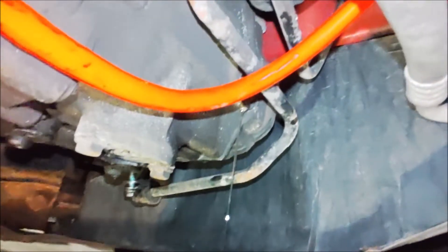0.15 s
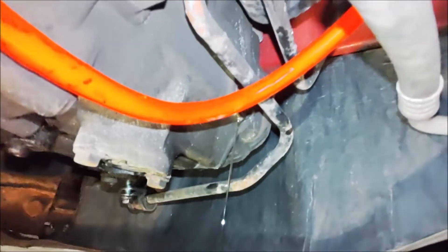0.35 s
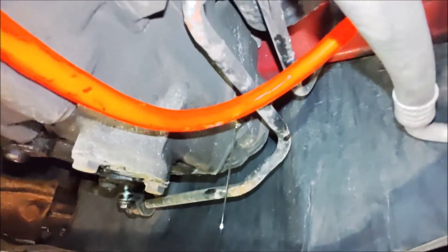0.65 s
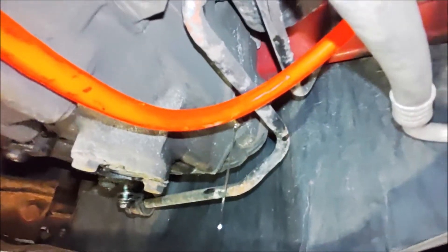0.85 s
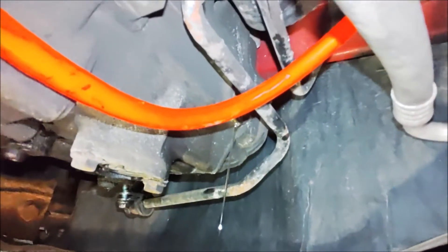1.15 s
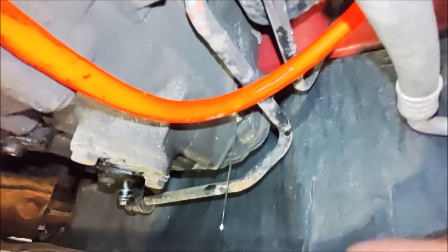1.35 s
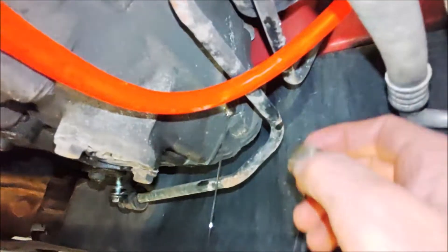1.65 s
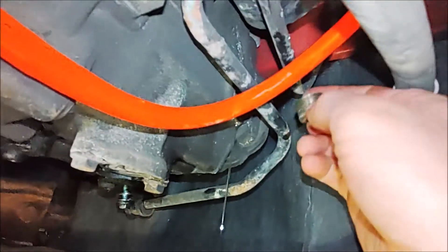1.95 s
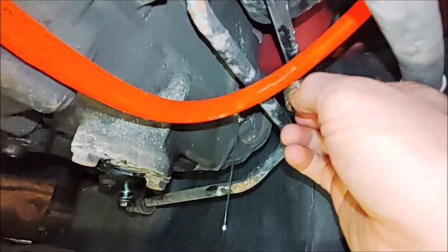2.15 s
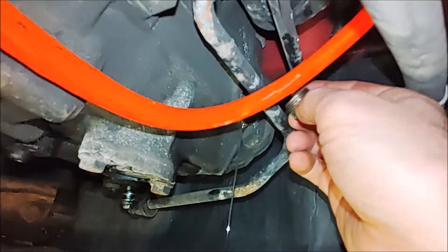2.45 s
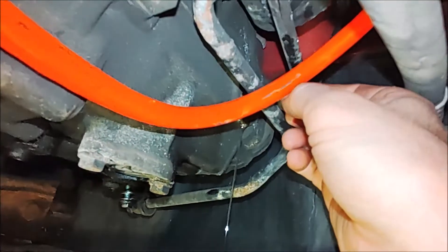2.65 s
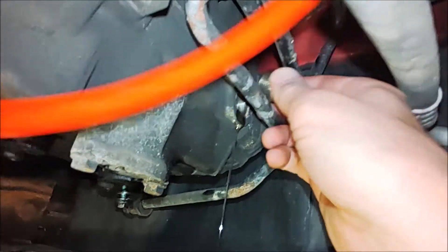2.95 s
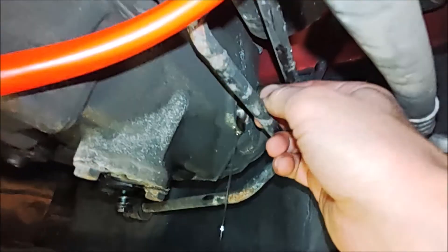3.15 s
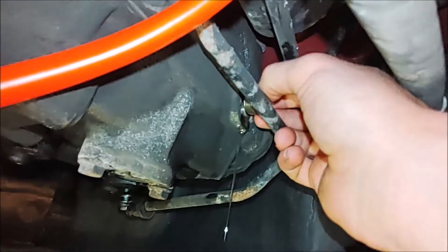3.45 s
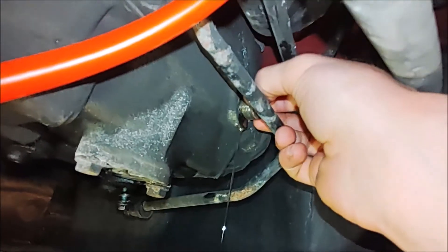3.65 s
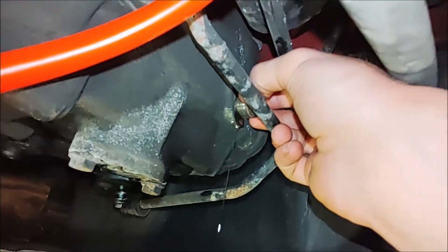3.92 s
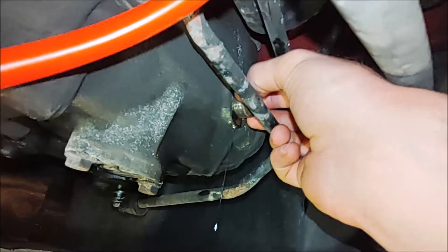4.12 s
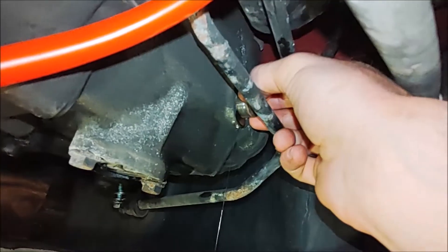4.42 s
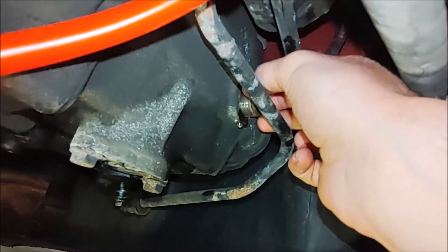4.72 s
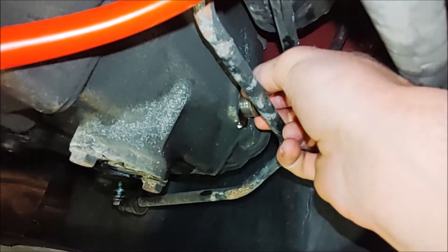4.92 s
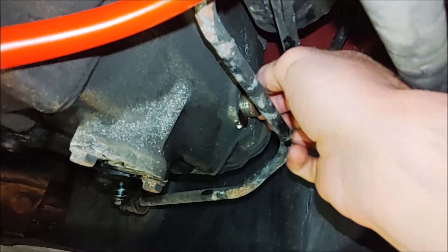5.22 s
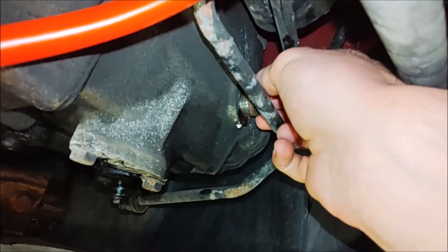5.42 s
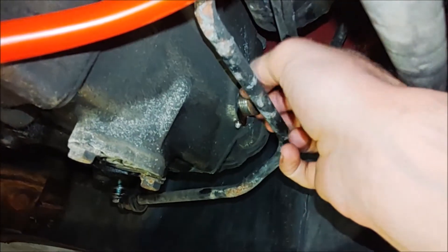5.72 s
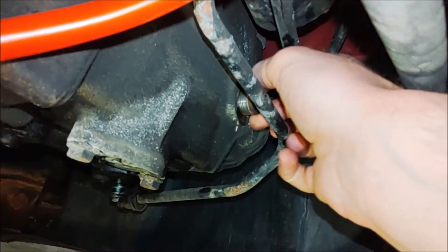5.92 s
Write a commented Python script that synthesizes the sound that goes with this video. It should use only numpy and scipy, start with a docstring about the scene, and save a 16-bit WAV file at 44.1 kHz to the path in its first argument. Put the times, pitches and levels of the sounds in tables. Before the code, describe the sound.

Close handheld pickup under a car in a garage, with flickering soft hiss, low rumble and a short diffuse echo. At 0-0.4 s there are deep handling bumps, bright plastic snaps, the strongest near 0.2, and a short gritty rasp with narrow ringing. Snaps and crinkling continue irregularly from 0.6 to 1.4, then become lighter. Small hollow raps on the recorder case and finger rubs come at 1.5-1.8, with a faint steel squeak. Sparse crackles run from 2 to 2.9. At 3.1 a hard dry click lands with a low thump; crisp snaps then crowd together until 4.07, when a very loud, harsh crack hits. Thin metallic squeaks flutter at 4.0-4.5, another sharp snap comes near 4.4, and a finger slide follows. Tiny high steel taps sound at 4.8-5.2. The end is quiet, with a few small crinkles and a soft cloth swish at 5.8.

```python
"""Plastic sheet snaps and crinkles under a car in a garage as a mechanic shifts on it and screws in a plug.
Snaps and crinkles are noise bursts and grains ringing patches of sheet and the hollow below the car.
The plug squeaks (filtered grains) and taps (decaying sines); hard clicks, a rasp and a cloth swish pass.
Fingers slide on, bump and rap the handheld recorder: filtered grains and decaying sines.
Coloured noise makes its rumble and the flickering hiss."""
import sys
import numpy as np
from scipy import signal
from scipy.fft import rfft, irfft
from scipy.io import wavfile
from scipy.ndimage import uniform_filter1d

SR = 44100
rng = np.random.default_rng(int(sys.argv[2]) if len(sys.argv) > 2 else 0)


def unload_wav(signal):
    """Save mono or channel-first audio to the path in sys.argv[1] as 16-bit WAV at rate SR, clipped to [-1, 1]."""
    wavfile.write(
        sys.argv[1],
        SR,
        np.round(np.clip(np.atleast_2d(signal).T, -1, 1) * 32767).astype(np.int16),
    )


N = 267687

# Resonances of the space below the car. Each row: frequency in Hz, width in Hz, level in dB.
HOLLOW_MODES = [(589.4, 54, 6.5), (1082, 109, 4.5), (1317, 33, 11), (1402, 126, 5.5), (1670, 390, 1),
                (2030, 96, 5.5), (2153, 46, 6.5), (2520, 290, 2.5)]
# Spectrum of plastic through the microphone port. Each row: frequency in Hz, density in dB per Hz.
PLASTIC_SPECTRUM = [(1200, -20.5), (2500, -11.5), (3500, -4.5), (5000, -7.5), (6300, -2), (7200, -8.5),
                    (8600, 3.5), (9600, -1.5), (10500, -12), (12500, -13), (16000, -11)]


def from_db(db):
    """Amplitude ratio of a level in dB."""
    return 10 ** (np.asarray(db) / 20)


def rms_one(x):
    """Scale to rms 1."""
    return x / np.sqrt(np.mean(x ** 2) + 1e-20)


def in_time(rows):
    """Columns of a curve table, interpolated to one value per sample."""
    times_s, *columns = np.transpose(rows)
    return [np.interp(np.arange(N) / SR, times_s, column) for column in columns]


def drift(rate_hz):
    """Slow chance of rms 1: white noise through a double real pole."""
    r = np.exp(-2 * np.pi * rate_hz / SR)
    noise = rng.standard_normal(N + SR)
    settled = signal.lfilter([1], [1, -2 * r, r * r], noise)[SR:]
    return rms_one(settled)


def colour(x, spectrum):
    """Minimum-phase filter following a (Hz, dB) spectrum; white noise keeps its rms."""
    hz, db = np.transpose(spectrum)
    grid_hz = np.linspace(0, SR / 2, 2049)
    gain = from_db(np.interp(np.log(grid_hz + 1), np.log(hz), db))
    cepstrum = irfft(np.log(gain))
    cepstrum[1:2048] *= 2   # folding gives minimum phase
    cepstrum[2049:] = 0
    taps = irfft(np.exp(rfft(cepstrum)))
    return signal.oaconvolve(x, taps / np.sqrt(np.sum(taps ** 2)))[:len(x)]


def resonance(x, hz, width_hz):
    """Two-pole peak of gain 1."""
    r = np.exp(-np.pi * width_hz / SR)
    numerator = np.array([1, 0, -1]) * (1 - r * r) / 2
    return signal.lfilter(numerator, [1, -2 * r * np.cos(2 * np.pi * hz / SR), r * r], x)


def body(x, peaks, waver_db=0.):
    """Parallel resonances of alternating sign, each drive wavering alone; white noise about keeps its rms."""
    power = sum(from_db(2 * db) * np.pi * width_hz / SR for hz, width_hz, db in peaks)
    out = 0
    for k, (hz, width_hz, db) in enumerate(peaks):
        drive = x * from_db(waver_db * drift(10.2)) + 1e-18
        out = out + (-1) ** k * from_db(db) * resonance(drive, hz, width_hz)
    return out / np.sqrt(power)


def grains(per_s, spread_db):
    """Random tiny clicks of uneven size and sign; rms 1."""
    sizes = from_db(spread_db * np.minimum(rng.exponential(1, N), 4)) * rng.choice([-1, 1], N)
    return rms_one(sizes * (rng.random(N) < per_s / SR))


def swell(start_s, length_s):
    """Rounded rise and fall of one gesture."""
    phase = np.clip((np.arange(N) / SR - start_s) / length_s, 0, 1)
    return np.sqrt(np.sin(np.pi * phase) + 1e-12)


def strike(hits, modes):
    """Each (s, dB) hit sets the (Hz, dB, t60 s) modes ringing as decaying sines."""
    t = np.arange(SR // 4) / SR
    out = np.zeros(N)
    ring = sum(np.sin(2 * np.pi * hz * t) * from_db(db - 60 * t / t60_s) for hz, db, t60_s in modes)
    for s, db in hits:
        at = round(s * SR)
        out[at:at + len(t)] += from_db(db) * ring
    return out


def snaps(rise_s=0.0011, broad_db=-7, side_db=-10, hollow_db=-6, linger=0.99, click=5.0, width_scale=1.7,
          top_db=-20.0, tick_db=-17.0):
    """A broad crack, then a gritty tail ringing a patch of sheet, a few side pitches and the hollow."""
    # Snaps of sheet and plug. Each row: start in seconds, level in dB, patch pitch in Hz,
    # hollow ring in dB re level (before hollow_db), t60 in seconds (before linger in the hollow),
    # first crack in dB re patch ring, width as share of pitch (before width_scale).
    snap_rows = [(0.0186, -28, 5850, -34, 0.064, 7, 0.11), (0.05, -27, 7660, -15, 0.076, -25, 0.099),
                 (0.0947, -14.5, 7740, -13.5, 0.093, 2, 0.7), (0.202, -26.5, 1830, -20, 0.13, 3, 0.19),
                 (0.2167, -9, 7480, -28, 0.046, -39, 0.12), (0.332, -37, 6900, -23, 0.049, -17, 0.18),
                 (0.359, -34, 7060, -20, 0.052, -17, 0.2), (0.39, -41, 6840, -20, 0.042, -15, 0.2),
                 (0.5905, -29, 8800, -13.5, 0.37, -9, 0.25), (0.625, -13.5, 8600, -31, 0.068, -1, 1),
                 (0.795, -19.5, 6400, -27, 0.07, -0.5, 0.049), (0.82, -30, 9100, -30, 0.042, -10, 0.3),
                 (0.8693, -19, 7300, -14.5, 0.037, -5, 0.74), (0.9, -25, 6650, -29, 0.05, 12, 0.12),
                 (0.911, -12, 7100, -25, 0.047, -29, 0.12), (0.9932, -31, 8000, -11, 0.11, -13, 0.36),
                 (1.013, -28, 7600, -14.5, 0.14, -12, 0.43), (1.051, -21.5, 9900, -10.5, 0.064, -21, 0.37),
                 (1.0868, -23, 7300, -10, 0.2, 7, 0.12), (1.19, -35, 2010, -10.5, 0.18, 14, 0.14),
                 (1.284, -23, 6570, -12, 0.091, 1, 0.11), (1.2946, -17.5, 7780, -19, 0.043, -35, 0.081),
                 (1.365, -33, 2330, -11, 0.062, 4, 0.14), (1.38, -32.5, 6250, -22, 0.1, 4, 0.1),
                 (1.513, -24.5, 8300, -14, 0.14, 11, 0.22), (1.641, -29, 8650, -19, 0.09, 3, 0.13),
                 (1.651, -31.5, 7900, -9.5, 0.23, 0.5, 0.52), (1.729, -22.5, 7900, -22, 0.083, 10, 0.13),
                 (1.7934, -22.5, 7860, -12, 0.095, 5, 0.87), (1.819, -29.5, 8460, -9.5, 0.062, -4, 0.13),
                 (1.8622, -24, 7700, -10, 0.05, -30, 1), (1.9877, -20, 9200, -12.5, 0.06, -2.5, 0.058),
                 (2.1209, -31, 2030, -9, 0.051, 2, 0.064), (2.2139, -26.5, 5860, -34, 0.046, 7.5, 0.062),
                 (2.228, -29, 9260, -9.5, 0.083, -13, 0.54), (2.4015, -24.5, 8150, -12.5, 0.065, 10, 0.29),
                 (2.45, -33, 8450, -7.5, 0.062, -14, 0.076), (2.509, -36, 4870, 1.5, 0.07, -17, 0.15),
                 (2.565, -26.5, 1880, -10.5, 0.026, -19, 0.56), (2.57, -33, 1900, -6, 0.051, -14, 0.18),
                 (2.649, -29, 6400, -12.5, 0.07, 6, 0.51), (2.669, -33.5, 6640, -12, 0.15, 4, 0.66),
                 (2.7005, -28.5, 6400, -8.5, 0.041, -30, 0.099), (2.7473, -24, 8350, -12, 0.13, 6, 0.31),
                 (2.768, -32.5, 1850, -5.5, 0.049, -21, 0.48), (2.7912, -33.5, 4220, -35, 0.063, 2, 0.13),
                 (2.9536, -23.5, 8800, -5, 0.023, -29, 0.27), (2.9902, -27.5, 7900, 6.5, 0.038, -6, 0.13),
                 (3.124, -22, 8000, -17, 0.27, 7.5, 0.12), (3.1451, -24, 9400, -33, 0.024, 19, 0.13),
                 (3.271, -33.5, 9100, -2, 0.12, -11, 0.35), (3.332, -27, 9600, -22, 0.36, -2, 0.5),
                 (3.3544, -27, 9200, -3.5, 0.03, -3, 0.12), (3.4258, -21, 8370, -32, 0.084, -17, 0.23),
                 (3.439, -23.5, 8700, -19, 0.075, -16, 0.049), (3.491, -32, 8200, -4.5, 0.21, -12, 0.16),
                 (3.53, -27, 7940, -39, 0.083, 4, 0.13), (3.5696, -28.5, 7450, -36, 0.069, -12, 0.29),
                 (3.5966, -16, 8500, -16, 0.055, 4, 0.056), (3.662, -26.5, 1940, -12, 0.075, 5, 0.063),
                 (3.705, -32, 8100, -23, 0.031, -7, 0.2), (3.715, -21.5, 8400, -18, 0.063, -28, 0.063),
                 (3.7504, -23.5, 7870, -9.5, 0.037, -24, 0.11), (3.7925, -28, 8650, -34, 0.14, 7, 0.13),
                 (3.8308, -16, 8100, -18.5, 0.036, -29, 0.3), (3.847, -22.5, 7900, -12, 0.092, -24, 0.24),
                 (3.91, -23.5, 9200, -16, 0.2, -37, 0.39), (3.9454, -18.5, 8300, -41, 0.077, -36, 0.11),
                 (3.978, -29.5, 5600, 1, 0.038, -4, 0.2), (3.998, -29, 8150, -30, 0.049, -6, 0.11),
                 (4.0255, -21.5, 8200, -42, 0.05, -11, 0.09), (4.061, -34, 7570, -35, 0.098, -19, 0.22),
                 (4.0748, 0.5, 7000, -28, 0.05, 4, 0.63), (4.18, -35.5, 5650, -29, 0.053, -7, 0.22),
                 (4.2043, -31, 8200, -30, 0.039, -20, 0.099), (4.217, -38, 3320, -14, 0.03, -6, 0.5),
                 (4.259, -26.5, 9600, -43, 0.11, -5, 0.039), (4.2854, -23.5, 7840, -11.5, 0.038, 0, 0.08),
                 (4.3683, -15.5, 8750, -48, 0.066, -39, 0.06), (4.3856, -29.5, 8300, -19, 0.091, -14, 0.17),
                 (4.4547, -34, 8970, -29, 0.076, -9, 0.08), (4.6576, -35.5, 7450, -24, 0.55, 9.5, 0.22),
                 (4.834, -27, 4200, -11, 0.026, -20, 0.67), (4.936, -22.5, 9840, -26.5, 0.041, -3, 0.21),
                 (5.053, -38, 3370, -4, 0.029, -13, 0.68), (5.112, -44, 2780, -11, 0.17, -10, 0.5),
                 (5.068, -37, 8450, -15, 0.085, 13, 0.39), (5.1956, -34.5, 8100, -21, 0.19, -1, 0.29),
                 (5.2269, -30, 2460, -7, 0.073, -18, 0.44), (5.2288, -20.5, 4500, -17, 0.016, -28, 0.42),
                 (5.352, -33, 8900, -20, 0.068, 2, 0.29), (5.7634, -34, 9200, -16, 0.13, -28, 0.27)]
    # First instant of a snap. Each row: frequency in Hz, density in dB per Hz.
    crack_spectrum = [(200, -85), (700, -35), (1500, -14.5), (3000, -7), (4500, -4), (6200, -1.5),
                      (9000, -1.5), (11000, -17.5), (16000, -6.5)]
    t = np.arange(SR // 6) / SR
    bright, dull = np.zeros((2, N + len(t)))
    tick = colour(1. * (t == 0), PLASTIC_SPECTRUM)   # the crease lets go
    tick *= from_db(tick_db) / np.max(np.abs(tick))
    # quick rise, fullest about 2 ms in
    onset = (1 - np.exp(-t / rise_s)) * (1 + 0.69 * np.exp(-t / 0.0022))
    noises = rng.standard_normal((len(snap_rows), 3, len(t)))
    sides = rng.random((len(snap_rows), 3))
    for row, noise, side in zip(snap_rows, noises, sides):
        s, db, hz, ring_db, t60_s, crack_db, width = row
        at, t60_s = round(s * SR), max(t60_s, .005)
        grit = from_db(2 * rms_one(uniform_filter1d(noise[2], size=90)))   # small after-ticks
        tail = noise[0] * grit * onset * from_db(-60 * t / t60_s)
        tail[0] = click   # opens with one clean click

        width_hz = width_scale * np.clip(width, .02, 1) * hz
        patch = resonance(resonance(tail, hz, width_hz), hz, width_hz)   # twice: steep skirts
        others = sum(resonance(tail, other_hz, 0.03 * other_hz) for other_hz in hz * 1.7 ** (side - .6))
        others += from_db(top_db + 13.6 * side[0]) * resonance(tail, 10700, 5500)   # uneven top
        patch += from_db(side_db) * others
        broad = rms_one(colour(tail, PLASTIC_SPECTRUM))
        patch = rms_one(patch) + from_db(broad_db + crack_db) * broad

        crack = colour(noise[0] * np.exp(-t / .0007), crack_spectrum)
        sound = patch / np.max(np.abs(patch)) + from_db(crack_db) * crack / np.max(np.abs(crack))
        bright[at:at + len(t)] += from_db(db) * (sound / np.max(np.abs(sound)) + tick)
        decay = from_db(db + ring_db + hollow_db - 60 * t / (linger * t60_s))
        dull[at:at + len(t)] += decay * noise[1] * grit
    port = signal.butter(2, 14000, fs=SR, output="sos")   # the microphone port dulls the top
    return signal.sosfilt(port, garage(bright[:N])) + body(dull[:N], HOLLOW_MODES)


def garage(x):
    """Adds a diffuse, dying echo of band-passed noise, without bass or top."""
    echo_db, t60_s = -17, 0.15
    t = np.arange(SR // 2) / SR
    band = signal.butter(2, [1500, 9500], "band", fs=SR, output="sos")
    echo = signal.sosfilt(band, rng.standard_normal(len(t)))
    echo *= (1 - np.exp(-t / 0.0021)) * from_db(-60 * t / t60_s)
    return x + from_db(echo_db) * signal.oaconvolve(x, echo / np.sqrt(np.sum(echo ** 2)))[:N]


def crinkle(count=18):
    """Grains of creasing plastic, swelling in crumples; each patch of sheet has its pitch and fits."""
    # Crinkling between the snaps. Each row: time in seconds, bright level in dB, hollow level in dB.
    crinkle_curve = [(0.0, -53.5, -58.5), (0.27, -45, -48), (0.47, -49, -55), (0.98, -54, -55),
                     (1.49, -60.5, -63.5), (1.77, -54, -62.5), (2.0, -62.5, -60), (2.6, -63.5, -63),
                     (2.97, -46.5, -51.5), (3.25, -46.5, -64), (3.38, -57.5, -62), (3.5, -43.5, -52.5),
                     (3.82, -95, -55), (4.18, -48.5, -58.5), (4.41, -61, -67), (4.77, -58, -66.5),
                     (4.95, -68, -74.5), (6.07, -63, -86)]
    # Many creases at once. Each row: start in seconds, length in seconds, bright level in dB, hollow level in dB.
    crumple_rows = [(0.242, 0.065, -33, -34), (0.611, 0.14, -59, -49.5), (1.078, 0.057, -35, -42.5),
                    (1.414, 0.091, -46.5, -45.5), (1.497, 0.067, -38, -42), (1.701, 0.077, -49, -42),
                    (1.974, 0.018, -44, -38.5), (2.102, 0.083, -56, -51.5), (2.985, 0.018, -44, -57),
                    (3.228, 0.044, -42.5, -39), (3.426, 0.077, -75, -46), (3.703, 0.052, -43, -46.5),
                    (3.938, 0.062, -42, -52.5), (4.382, 0.025, -42.5, -52), (4.788, 0.044, -49, -74),
                    (5.758, 0.034, -51.5, -83), (5.974, 0.071, -50.5, -57)]
    bright, hollow = from_db(in_time(crinkle_curve))
    for s, length_s, bright_db, hollow_db in crumple_rows:
        phase = np.clip((np.arange(N) / SR - s) / length_s, 0, 1)
        shape = (np.sin(np.pi * phase ** 0.65) + 1e-12) ** 1.4
        bright = bright + from_db(bright_db) * shape
        hollow = hollow + from_db(hollow_db) * shape

    ticks = grains(5000, spread_db=4.5)
    patch = rng.integers(0, count, N)   # which patch each grain excites
    patches = 0
    for k, hz in enumerate(np.geomspace(2400, 15000, count)):
        ring = rms_one(resonance(ticks * (patch == k), hz, .07 * hz))
        patches = patches + ring / np.sqrt(hz) * from_db(4 * drift(15))
    fine = from_db(17.0) * grains(3300, spread_db=-8.0)
    creases = colour(rms_one(patches) + fine, PLASTIC_SPECTRUM)
    creases *= from_db(2.5 * drift(45))   # in quick fits
    drive = grains(900, spread_db=4.5) * from_db(3 * drift(30))
    ringing = body(drive, HOLLOW_MODES, waver_db=4.5)
    return bright * rms_one(creases) + hollow * rms_one(ringing)


def thread():
    """Steel squeaks on steel: uneven slips ring plug and housing at a pitch that changes with the hold."""
    # Squeaks as the plug is handled and turned. Each row: start in seconds, length in seconds,
    # level in dB, pitch in Hz.
    squeaks = [(1.775, 0.033, -41, 2070), (3.965, 0.036, -42.5, 2200), (4.236, 0.025, -49, 2240),
               (4.264, 0.025, -46, 2300), (4.336, 0.013, -55, 2340), (4.37, 0.033, -50, 2370),
               (4.38, 0.026, -43.5, 2540), (4.451, 0.013, -52, 2530)]
    width_hz = 200
    slips = grains(1900, spread_db=4.5)
    out = np.zeros(N)
    for s, length_s, db, hz in squeaks:
        ring = resonance(resonance(slips, hz, width_hz), hz, 2 * width_hz)
        ring += from_db(-9) * resonance(slips, 1.04 * hz, 2 * width_hz)
        out += from_db(db) * swell(s, length_s) * rms_one(ring)
    return out


def plug():
    """The plug taps the housing; each tap sets the small steel modes ringing."""
    # Taps on the housing. Each row: time in seconds, level in dB.
    taps = [(4.803, -47.5), (4.937, -41), (5.1936, -53)]
    # Steel modes. Each row: frequency in Hz, level in dB, t60 in seconds.
    steel_modes = [(8300, 8, 0.086), (6400, -13, 0.11), (9200, -21, 0.076)]
    return strike(taps, steel_modes)


def hard_clicks():
    """Two hard, close clicks of short modes; the first also jolts the case."""
    # Clicks. Each row: time in seconds, level in dB.
    clicks = [(3.1449, -2), (4.0733, -2.5)]
    # Click modes. Each row: frequency in Hz, level in dB, t60 in seconds.
    click_modes = [(2480, -34, 0.014), (3750, -24, 0.031), (4250, -4, 0.0068), (5100, -18, 0.015),
                   (5860, -14, 0.0081), (6330, 1, 0.0037), (8700, 8.5, 0.0027)]
    # Jolt of the case. One row: frequency in Hz, level in dB, t60 in seconds.
    thud_mode = (750, -12.5, 0.012)
    return strike(clicks, click_modes) + strike(clicks[:1], [thud_mode])


def rasp():
    """Something gritty drags over the floor: coarse grit under one stroke, ringing on in narrow modes."""
    # The stroke. One row: start in seconds, length in seconds, level in dB.
    stroke = (0.221, 0.084, -29)
    # Resonances. Each row: frequency in Hz, width in Hz, level in dB.
    rasp_modes = [(847, 24, -1), (1203, 13, 0), (1574, 39, -4.5), (1850, 45, -5), (2140, 31, 0),
                  (2425, 26, -7.5), (8800, 680, -5)]
    s, length_s, db = stroke
    grit = swell(s, length_s) ** 2 * grains(1224, spread_db=1.0)
    return from_db(db) * body(grit, rasp_modes)


def sleeve():
    """Cloth brushing past: a soft, duller swish of band-passed grains."""
    # The brush. One row: start in seconds, length in seconds, level in dB.
    brush = (5.77, 0.15, -48.5)
    s, length_s, db = brush
    band = signal.butter(2, [1200, 6500], "band", fs=SR, output="sos")
    swish = signal.sosfilt(band, grains(5300, spread_db=0.0))
    return from_db(db) * swell(s, length_s) ** 3 * rms_one(swish)


def raps():
    """A nail raps the recorder case, ringing one mode per rap."""
    # Raps. Each row: time in seconds, level in dB, pitch in Hz.
    rap_rows = [(1.539, -27, 513), (1.589, -39.5, 523), (1.741, -29, 482), (1.757, -33.5, 510),
                (1.792, -46, 500), (3.241, -34, 446)]
    t60_s = 0.063
    return sum(strike([(s, db)], [(hz, 0, t60_s)]) for s, db, hz in rap_rows)


def handling():
    """Skin slips through the case resonances, fingertip taps, soft low bumps and a lumpy rumble."""
    # Bumps on the case. Each row: start in seconds, level in dB before the soft attack, pitch in Hz,
    # t60 in seconds, fingertip tap in dB before the touch filters.
    bumps = [(0.032, -25, 60, 0.036, -19), (0.061, -5.5, 52, 0.04, -8.5), (0.096, -21, 78, 0.057, -9),
             (0.223, -29, 84, 0.15, -36), (0.263, -22, 96, 0.087, -50), (0.331, -12.5, 134, 0.029, -25),
             (0.31, -13.5, 95, 0.04, -24), (1.485, -31.5, 120, 0.092, -42), (1.51, -33, 56.6, 0.11, -34),
             (1.54, -24, 168, 0.065, -30), (1.555, -34, 47.5, 0.36, -32), (1.736, -25, 181, 0.03, -42),
             (1.763, -24.5, 206, 0.029, -33), (3.111, 0, 77, 0.045, -49), (3.143, -20, 74.5, 0.093, -41),
             (3.252, -21.5, 98, 0.095, -71), (3.352, -23, 88, 0.072, -44), (4.527, -21, 96, 0.07, -33),
             (5.49, -19, 94, 0.042, -38.5)]
    # Recorder case. Each row: frequency in Hz, width in Hz, level in dB.
    case_modes = [(214, 234, -3), (348, 45, 1.5), (439.6, 60, 3.5), (609, 61, 3), (673, 94, 0)]
    # Rumble. Each row: frequency in Hz, density in dB per Hz.
    rumble_spectrum = [(8.8, -45), (15, 6), (48, 1), (80, -4), (113, -9.5), (188, -21), (254, -24.5),
                       (400, -23.5), (520, -61), (880, -120)]
    slips = grains(4000, spread_db=1.5) * from_db(1.2 * drift(35))
    touch = slides() * rms_one(body(slips, case_modes, waver_db=1.2))
    rumble = rms_one(colour(rng.standard_normal(N), rumble_spectrum))
    out = from_db(sway() + 2 * drift(3.9)) * rumble

    t = np.arange(SR // 4) / SR
    # the fingertip lands: a short dull tap
    tap = -np.sin(2 * np.pi * 430 * t) * (np.exp(-t / 0.00085) + 0.23 * np.exp(-t / 0.0052))
    for s, db, hz, t60_s, tap_db in bumps:
        at = round(s * SR)
        touch[at:at + len(t)] += from_db(tap_db) * tap
        envelope = (1 - np.exp(-t / 0.0045)) * from_db(db - 60 * t / t60_s)
        out[at:at + len(t)] += np.sin(2 * np.pi * hz * t) * envelope
    soft = signal.sosfilt(signal.butter(4, 640, fs=SR, output="sos"), touch)   # skin excites little treble
    return out + soft + from_db(-10) * resonance(touch, 1250, 500)


def slides():
    """Skin pressure: each slide sets in quickly, drifts from first to last level and lifts off."""
    # Fingers sliding on the case, before the touch filters. Each row: start in seconds,
    # length in seconds, first level in dB, last level in dB.
    slide_rows = [(0.0, 0.15, -45, -56), (0.262, 0.3, -34.5, -65), (0.877, 0.048, -64, -50),
                  (1.056, 0.055, -60, -54), (1.423, 0.098, -47.5, -54), (1.512, 0.047, -46, -47),
                  (1.588, 0.25, -57, -59), (1.727, 0.035, -39.5, -45), (1.98, 0.096, -50, -75),
                  (2.12, 0.15, -56.5, -69), (2.915, 0.083, -56.5, -53.5), (3.111, 0.01, -33, -35),
                  (3.148, 0.06, -43.5, -39), (3.242, 0.073, -46, -43.5), (3.352, 0.07, -37, -46.5),
                  (3.804, 0.17, -68, -52), (4.533, 0.21, -49.5, -39), (5.053, 0.0097, -49, -74)]
    attack_s, fade_db_per_s, resting_db = 0.0084, 704, -70
    t, out = np.arange(N) / SR, from_db(resting_db)
    for s, length_s, first_db, last_db in slide_rows:
        db = np.interp(t, [s, s + length_s], [first_db, last_db])
        db -= fade_db_per_s * np.maximum(t - s - length_s, 0)
        out = out + np.clip((t - s) / attack_s + 1, 0, 1) ** 2 * from_db(db)
    return out


def sway():
    """Rumble level in dB: it swells into each shift of grip and settles after it."""
    # Steady hold and room. Each row: time in seconds, rumble in dB.
    steady_curve = [(0.0, -48), (2.7, -51.5), (6.07, -52.5)]
    # Grip shifts. Each row: time in seconds, hold in seconds, rumble in dB.
    shift_rows = [(0.0, 0.4, -39.5), (1.533, 0.017, -38), (1.76, 0.06, -44.5), (3.245, 0.078, -39),
                  (4.577, 0.057, -41.5)]
    rise_db_per_s, fall_db_per_s = 92, 54
    t, db = np.arange(N) / SR, in_time(steady_curve)[0]
    for s, hold_s, top_db in shift_rows:
        rise_db = rise_db_per_s * np.maximum(s - t, 0)
        fall_db = fall_db_per_s * np.maximum(t - s - hold_s, 0)
        db = np.maximum(db, top_db - rise_db - fall_db)
    return db


def room_hiss():
    """Continuous, flickering room and microphone hiss: coloured noise with a drifting level."""
    # Hiss. Each row: frequency in Hz, density in dB per Hz.
    hiss_spectrum = [(88, -20), (150, -26), (259, -21), (431, -11), (871, -6), (2550, -9.5), (5460, -11),
                     (8730, -5), (16000, -10)]
    centre_db, flicker_db = -63.5, 4.0
    level = from_db(centre_db + flicker_db * drift(17))
    return level * colour(rng.standard_normal(N), hiss_spectrum)


def scene():
    """Everything reaches one microphone."""
    sheet = snaps() + crinkle()
    work = thread() + plug() + hard_clicks() + rasp() + sleeve()
    recorder = raps() + handling()
    return (sheet + work + recorder + room_hiss())[None]


def record(dry):
    """Peaks are clipped at full scale, then the top is cut."""
    stop_hz = 16230   # 40 dB down from here up
    low_pass = signal.cheby2(12, 40, stop_hz, fs=SR, output="sos")
    return signal.sosfilt(low_pass, np.clip(dry, -1, 1))


dry = scene()
out = record(dry)
unload_wav(out)
```